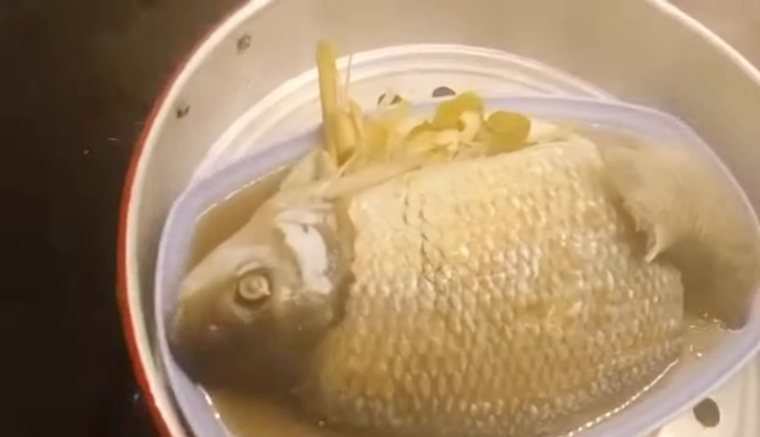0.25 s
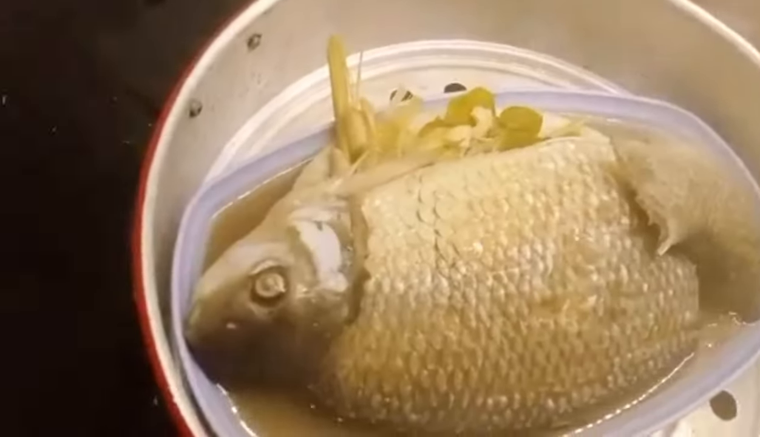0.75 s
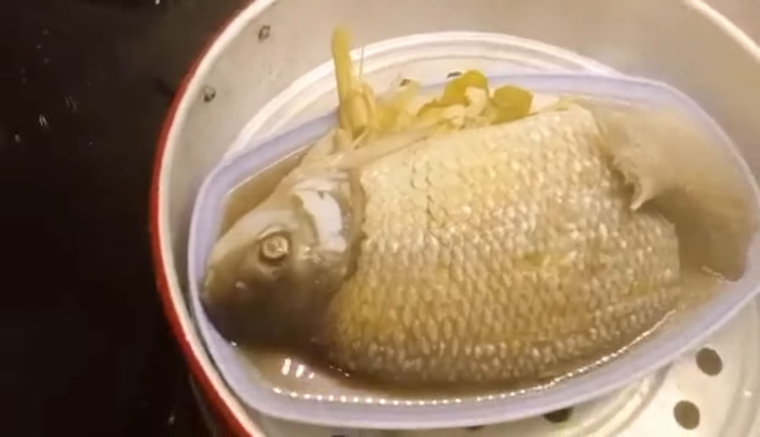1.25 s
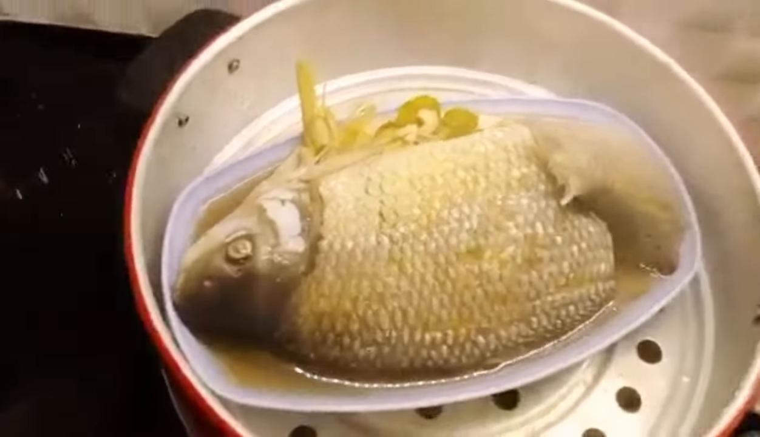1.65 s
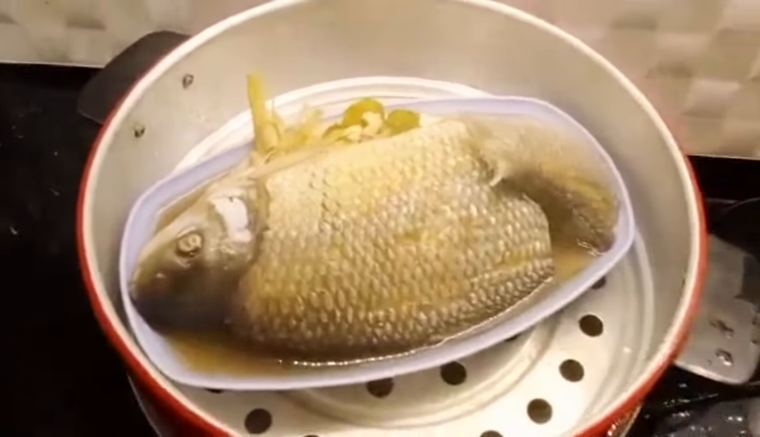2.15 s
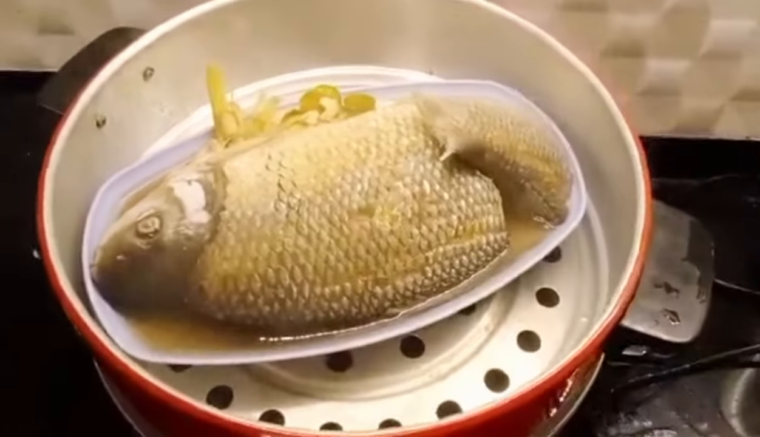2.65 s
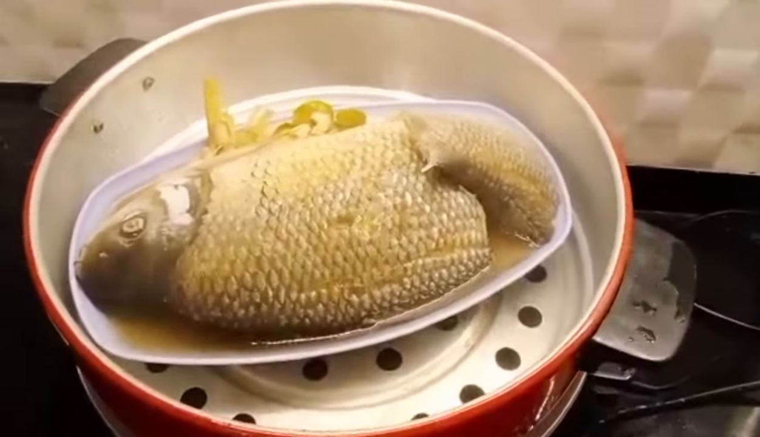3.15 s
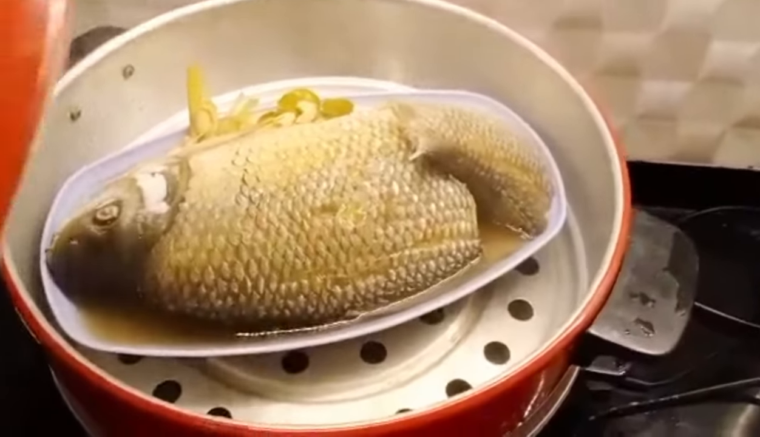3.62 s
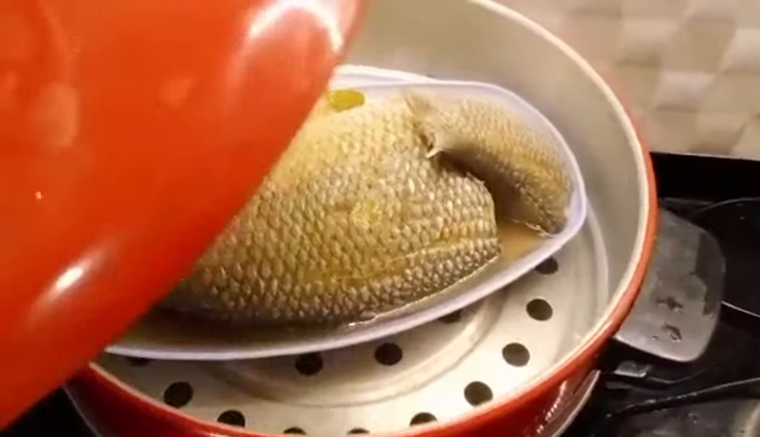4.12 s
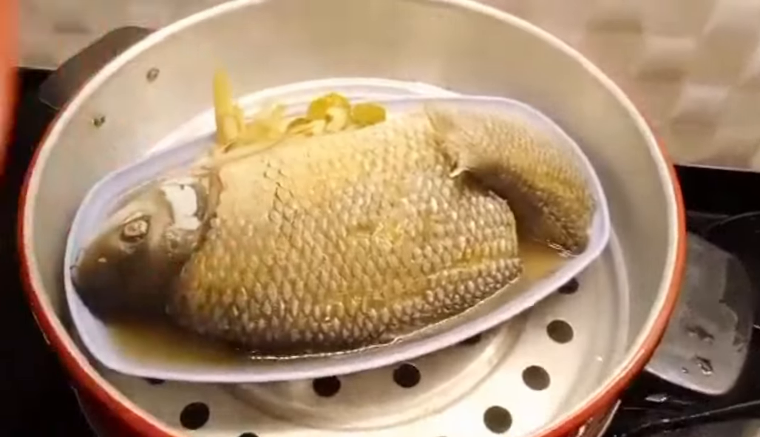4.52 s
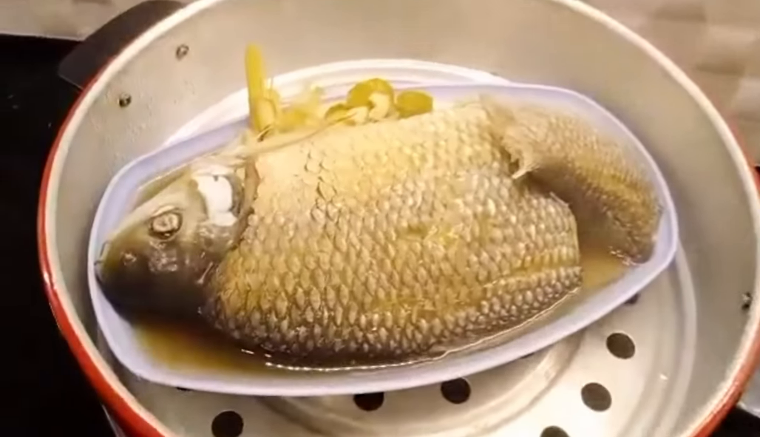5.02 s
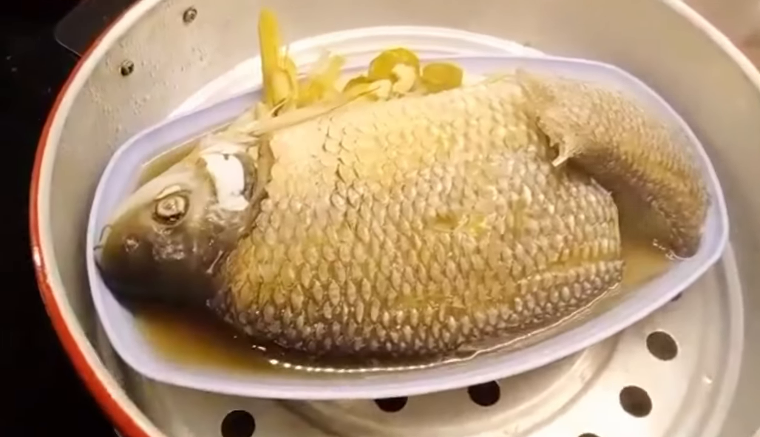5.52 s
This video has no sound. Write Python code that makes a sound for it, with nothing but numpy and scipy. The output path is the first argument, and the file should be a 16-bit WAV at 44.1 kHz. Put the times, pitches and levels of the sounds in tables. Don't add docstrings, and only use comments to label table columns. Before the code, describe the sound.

A continuous jet of steam from an open steamer pot fills the sound, airy and sizzling, its strength and brightness wavering as the phone moves. Weak bubble thuds lie far beneath. One muffled knock is followed later by a clearer metallic lid knock and a hollow swell as the lid swings by. The capture is close and dry, with suppressed lows, faint watery leaks of narrow tone and flickering stereo treble.

```python
import sys
import numpy as np
from scipy import signal
from scipy.fft import rfft, irfft, next_fast_len
from scipy.io import wavfile
from scipy.ndimage import uniform_filter1d

SR = 44100
rng = np.random.default_rng(int(sys.argv[2]) if len(sys.argv) > 2 else 0)


def unload_wav(signal):
    wavfile.write(
        sys.argv[1],
        SR,
        np.round(np.clip(np.atleast_2d(signal).T, -1, 1) * 32767).astype(np.int16),
    )


def field_ratio(decibels):
    return 10 ** (np.asarray(decibels, dtype=float) / 20)


N = 254872

# time in seconds, flow as level in dB, aim of the phone at the jets as brightness in dB.
STEAM_CURVE = [(0.0, -14, 1), (0.17, -13.5, 4), (0.5, -14, -0.3), (1.08, -19, 1), (1.4, -14, 0.7),
               (1.65, -14, 2.5), (2.05, -15.5, 0), (2.27, -12.5, -1.5), (2.42, -14, -2), (2.7, -18, -0.2),
               (3.1, -16.5, -3), (3.3, -16, -3.2), (3.56, -14, 0.8), (3.68, -15.8, 1.5), (3.88, -14, 0.3),
               (4.15, -16.0, -1.2), (5.25, -18, -1.3), (5.78, -14.5, -0.5)]
ZONE_CENTRES_HZ = [1170, 2200, 4200, 7200, 12000]
ZONE_FLOW_SWING = [-0.23, -.2, 0.11, -0.2, -0.027]
ZONE_AIM_SWING = [0.41, -0.34, 0.31, 0.7, 0.39]
ZONE_WANDER_DB = [0.96, .3, 0.28, 0.56, 0.74]
# time in seconds, level in dB.
LOW_EDGE_CURVE = [(0, 4.5), (.2, 2.5), (.95, 3), (1.06, 6), (1.35, 1), (3.2, 4.5), (3.95, 2), (4.3, -5),
                  (5.78, -4.5)]
# time in seconds, half length in seconds, centre in Hz, change in dB.
COLOUR_SWAYS = [(1.32, 0.025, 1180, -4), (1.408, 0.018, 1170, -6), (1.68, .03, 1170, -7.5),
                (2.86, 0.14, 1070, -7), (2.998, 0.034, 1150, -3), (3.4, 0.13, 1170, -9.5),
                (3.642, 0.048, 1180, -14), (4.1, 0.075, 1170, -2), (4.33, 0.046, 1170, -0.5),
                (4.6, 0.046, 1200, -7), (4.9, 0.049, 1180, -4.5), (5.06, 0.026, 1180, -10),
                (5.3, 0.048, 1170, -7.5), (5.64, 0.04, 1170, -8), (5.55, .1, 1630, -7),
                (.32, 0.13, 6300, 1), (1.07, 0.065, 4580, -2), (1.58, 0.13, 2750, -1.5),
                (2.08, 0.1, 12100, -3), (2.39, 0.023, 7240, 4.5), (3.15, 0.074, 12000, -2.5),
                (4.25, 0.11, 4200, 1.8), (4.65, 0.053, 3800, 3.5), (4.62, 0.065, 12000, 4),
                (4.98, 0.062, 12000, 2), (5.41, 0.026, 5800, -4.5), (1.2, 0.18, 11000, 4),
                (5.72, 0.045, 6500, 4)]
# frequency in Hz, level in dB per Hz.
HISS_SPECTRUM = [(610, -42), (1030, -6), (1100, -1.5), (1220, -2), (1510, -3.5), (1830, -6), (1990, -3),
                 (2490, -0.5), (3970, 1), (4860, -2.5), (6830, -3), (9300, -21), (11300, -16.5),
                 (12500, -5), (13100, -4)]
# frequency in Hz, level in dB per Hz.
SIDE_SPECTRUM = [(2350, -49), (4000, -18), (4100, -5), (4300, -4), (6500, -0.5), (7340, -5), (9360, -19),
                 (11500, -12.5), (12200, -5.5), (12800, -5.5), (16600, -39), (22000, -120)]
# frequency in Hz, width in Hz, dB re body.
TRAY_WHISTLES = [(1490, 210, -15.5), (1647, 40, -19), (3990, 280, -12), (6740, 250, -48),
                 (12830, 600, -15.5)]
# frequency in Hz, level in dB per Hz.
SIMMER_SPECTRUM = [(120, -55), (200, -15), (318, -4.5), (383, -5.5), (451, -1), (491, -6.5), (649, -2),
                   (738, -2.5), (800, -6), (1040, -38), (1760, -120)]
# frequency in Hz, level in dB per Hz.
RUMBLE_SPECTRUM = [(15, -45), (25, -6), (48, 3), (75, -1), (91, -1.5), (130, 7), (161, -12), (200, -15.5),
                   (260, -1), (340, 5.5), (570, -120)]
# frequency in Hz, width in Hz, dB re rumble.
BASE_MODES = [(93.5, 28, 0), (159, 10.4, -4.5)]
# start in seconds, peak in dB.
BUBBLE_BURSTS = [(0.114, -36), (0.411, -32.5), (0.454, -40), (0.559, -45), (0.658, -31.5), (0.836, -30),
                 (1.239, -46), (1.346, -35), (1.747, -40), (1.891, -40), (1.953, -45), (2.567, -31.5),
                 (3.099, -33), (3.299, -38), (3.675, -36), (3.805, -33), (4.299, -52), (4.57, -39),
                 (4.874, -46), (4.938, -50), (5.491, -33), (5.617, -37)]
# start in seconds, peak in dB.
FRINGE_OPENINGS = [(0.019, -28.5), (0.187, -30), (0.297, -34), (0.457, -33), (0.659, -52), (1.044, -32),
                   (1.222, -32), (1.495, -33), (1.695, -29), (2.066, -32), (2.302, -30), (2.424, -31),
                   (3.169, -28.5), (3.298, -47), (3.558, -27.5), (3.619, -31), (3.739, -23), (3.851, -18.5),
                   (4.074, -37), (5.656, -36)]
# time in seconds, length in seconds, Hz, level in dB.
BAND_LEAKS = [(0.026, 0.05, 292, -41), (0.454, 0.068, 425, -43), (1.55, 0.053, 433, -48),
              (2.203, .06, 308, -45), (2.276, 0.1, 430, -47), (3.187, 0.12, 460, -36),
              (3.31, 0.029, 1070, -28.5), (3.422, 0.079, 446, -43), (3.57, 0.57, 1500, -30.5),
              (3.688, 0.064, 282, -46), (3.815, 0.16, 470, -36), (4.008, 0.2, 634, -36),
              (4.323, 0.081, 660, -47), (4.558, 0.42, 1060, -36), (4.72, 0.1, 320, -42.5),
              (4.887, 0.25, 1490, -34.5), (5.133, 0.051, 1060, -34.5), (5.145, 0.046, 454, -49),
              (3.645, 0.073, 480, -42), (3.193, 0.077, 593, -37.5), (4.114, 0.1, 869, -36),
              (0.864, 0.046, 450, -41), (0.876, 0.035, 280, -44), (3.153, 0.13, 150, -53),
              (3.963, 0.023, 460, -34), (2.283, 0.16, 3920, -21.5), (5.411, 0.041, 1060, -36.5),
              (5.499, 0.14, 160, -48.5), (5.63, 0.044, 660, -46), (5.742, 0.081, 1203, -37)]
# start in seconds, peak in dB, softness in Hz, share of lid ring 0-1, tail in seconds.
LID_KNOCKS = [
    (0.845, -23, 800, 0.25, 0.096),
    (3.141, -20.5, 1100, 0.93, 0.09),
]
# frequency in Hz, level in dB, time to fall by 60 dB in seconds.
LID_MODES = [(160, -1.5, 0.28), (460, 1.5, 0.11), (660, 20, 0.082), (1060, 9.5, 0.26), (1230, 22.5, 0.1),
             (1450, 17, 0.087)]
# frequency in Hz, width in Hz, level in dB.
LID_HOLLOW = [(470, 71, -5), (642, 46, 1), (558, 44, -3.5), (754, 42, -6), (1150, 57, -2), (1500, 72, -6.5)]
# frequency in Hz, share of the running noise power that is taken off.
NOISE_SHARE = [(60, 0.16), (300, 0.16), (1000, 0.42), (2000, 0.09), (6000, 0.21), (13000, 0.066)]
# frequency in Hz, chance that the band drops out.
SIDE_DROPOUTS = [(4100, .7), (4500, .42), (4900, .2), (5400, .07), (6500, .03), (8000, .08), (9000, .14),
                 (11000, .17), (12000, .3), (12800, .45)]

OPEN_HZ, TOP_HZ = 1005, 13070
BODY_DB = -4.5
SWAY_OCTAVES = 0.28
SIMMER_LEVEL_DB, SIMMER_UNDER_LID_DB = -49.5, -39
BURST_RISE_S, BURST_FALL_S, BURST_DB, RUMBLE_DB = 0.016, 0.035, -10.5, -53.5
OPEN_RISE_S, OPEN_FALL_S, OPEN_DB, SHUT_DB = 0.01, 0.075, -10, -49.5
SWING_S, COMING_S, GOING_S, SWING_DB = 3.834, 0.16, 0.096, -24.5


def in_time(rows):
    s, *columns = np.transpose(rows)
    return [np.interp(np.arange(N) / SR, s, c) for c in columns]


def at_hz(points, hz):
    table = np.array(points)
    return np.interp(np.log(hz + 1), np.log(table[:, 0]), table[:, 1])


def rms_one(x):
    return x / np.sqrt(np.mean(x ** 2) + 1e-20)


def held(x, seconds):
    power = uniform_filter1d(x ** 2, size=round(seconds * SR))
    return rms_one(x / (power + 0.1) ** 0.49)


def drift(rate_hz):
    r = np.exp(-80 * np.pi * rate_hz / SR)
    noise = rng.standard_normal(N // 40 + 2002)
    slow = signal.lfilter([1], [1, -2 * r, r * r], noise)[2000:]
    return np.interp(np.arange(N) / 40, np.arange(len(slow)), rms_one(slow))


def swells(events, rise_s, fall_s):
    s, db = np.transpose(events)
    t = np.arange(N)[::40] / SR - s[:, None] - rise_s
    shape = np.exp(-np.where(t < 0, t / rise_s, t / fall_s) ** 2)
    return np.interp(np.arange(N) / 40, np.arange(t.shape[1]), field_ratio(db) @ shape)


def resonance(x, hz, width_hz):
    r = np.exp(-np.pi * width_hz / SR)
    top = [(1 - r * r) / 2, 0, (r * r - 1) / 2]
    return signal.lfilter(top, [1, -2 * r * np.cos(2 * np.pi * hz / SR), r * r], x)


def narrow(noise, hz, width_hz):
    return rms_one(resonance(resonance(noise, hz, width_hz), hz, width_hz))


def unsteady_notes(modes, unrest_db, rate_hz):
    notes = 0
    for hz, width_hz, db in modes:
        level = field_ratio(db + unrest_db * drift(rate_hz))
        notes = notes + level * narrow(rng.standard_normal(N), hz, width_hz)
    return notes


def only(x, low_hz, high_hz):
    size = next_fast_len(N)
    hz = np.arange(size // 2 + 1) * SR / size
    return irfft(rfft(x, size) * ((hz > low_hz) & (hz < high_hz)), size)[..., :N]


def bands(spectrum, source, count):
    hz, level_db = np.transpose(spectrum)
    size = next_fast_len(N)
    pitch = np.log(np.arange(size // 2 + 1) * SR / size + 1e-9)
    colour = field_ratio(np.interp(pitch, np.log(hz), level_db, left=-200, right=-200))
    lines = rfft(source, size) * colour
    lines /= np.sqrt(2 * np.sum(np.abs(lines) ** 2) / size / N)
    centres = np.linspace(np.log(hz[0]), np.log(hz[-1]), count)
    for centre in centres:
        slice_ = np.clip(1 - np.abs(pitch - centre) / (centres[1] - centres[0]), 0, 1)
        yield np.exp(centre), irfft(lines * slice_, size)[:N]


def lumpy(spectrum, unrest_db, rate_hz, count):
    parts = bands(spectrum, rng.standard_normal(N), count)
    return sum(field_ratio(unrest_db * drift(rate_hz)) * band for _, band in parts)


def turbulence(spit_per_s, spit_db):
    hits = rng.random(N) < spit_per_s / SR
    sizes = field_ratio(4.75 * np.minimum(rng.exponential(1, N), 4))
    drops = hits * sizes * rng.choice([-1, 1], N)
    return rng.standard_normal(N) + field_ratio(spit_db) * rms_one(drops)


def swayed(hz):
    s, half_s, centre_hz, db = np.transpose(COLOUR_SWAYS)
    t = np.arange(0, N, 100) / SR
    reach = db * np.exp(-(np.log2(hz / centre_hz) / SWAY_OCTAVES) ** 2)
    humps = np.exp(-((t - s[:, None]) / half_s[:, None]) ** 2)
    return np.interp(np.arange(N) / SR, t, reach @ humps)


def steam(spectrum, level_db, gust, patchy_db, count):
    flow, aim = in_time(STEAM_CURVE)
    zones = np.outer(ZONE_FLOW_SWING, flow) + np.outer(ZONE_AIM_SWING, aim)
    zones += [db * drift(10.7) for db in ZONE_WANDER_DB]
    zones[0] += in_time(LOW_EDGE_CURVE)[0]
    zones -= zones.mean(axis=1, keepdims=True)
    hiss, neighbour = 0, drift(12.0)
    for hz, band in bands(spectrum, turbulence(2500, -8.0), count):
        place = np.interp(np.log(hz), np.log(ZONE_CENTRES_HZ), np.arange(5))
        zone_db = np.clip(1 - np.abs(np.arange(5) - place), 0, 1) @ zones + swayed(hz)
        gust_db = gust * (hz / 4000) ** 0.48
        own = drift(30.4)
        flicker_db = patchy_db * (own + 0.11 * neighbour)
        hiss = hiss + field_ratio(zone_db + gust_db + flicker_db) * band
        neighbour = own
    return field_ratio(flow + BODY_DB + level_db) * only(hiss, OPEN_HZ, TOP_HZ)


def whistles():
    return field_ratio(in_time(STEAM_CURVE)[0] + BODY_DB) * unsteady_notes(TRAY_WHISTLES, 2.2, 3.5)


def lid_near():
    t = np.arange(N) / SR - SWING_S
    return np.exp(-np.abs(np.where(t < 0, t / COMING_S, t / GOING_S)) ** 1.13)


def simmer():
    level = field_ratio(SIMMER_LEVEL_DB) + field_ratio(SIMMER_UNDER_LID_DB) * lid_near() ** 0.7
    return field_ratio(2.5) * level * lumpy(SIMMER_SPECTRUM, 1.6, 14.0, count=8)


def rumble():
    boil = field_ratio(-4.0) * lumpy(RUMBLE_SPECTRUM, 1.2, 17.0, count=5)
    boom = unsteady_notes(BASE_MODES, 2.7, 4.2)
    heat = field_ratio(RUMBLE_DB) + field_ratio(BURST_DB) * swells(BUBBLE_BURSTS, BURST_RISE_S, BURST_FALL_S)
    return heat * field_ratio(2.0) * held(boil + boom, 0.034)


def fringe():
    noise = rms_one(only(resonance(rng.standard_normal(N), 905, 130), 800, OPEN_HZ))
    gate = field_ratio(SHUT_DB) + field_ratio(OPEN_DB) * swells(FRINGE_OPENINGS, OPEN_RISE_S, OPEN_FALL_S)
    return field_ratio(3.5) * gate * held(noise, 0.056)


def leaks():
    out, white = np.zeros(N), rng.standard_normal(N)
    for s, length_s, hz, db in BAND_LEAKS:
        start = max(round((s - length_s * 0.584) * SR), 0)
        end = round((s + length_s * 0.6) * SR)
        piece = narrow(white[start:end], hz, 40 + 0.011 * hz)
        envelope = np.abs(signal.hilbert(piece))
        piece = rms_one(piece / (envelope + 0.6) ** 0.6)
        out[start:start + len(piece)] += field_ratio(db) * piece * signal.windows.tukey(len(piece), 0.3)
    return out


def knocks():
    out, t = np.zeros(N), np.arange(SR // 4) / SR
    for s, db, soft_hz, ring, tail_s in LID_KNOCKS:
        click = 24.0 * np.exp(-t / 0.0003)
        rattle = 2.0 * rng.standard_normal(len(t)) * (t < tail_s) * np.exp(-t / tail_s)
        softness = signal.butter(3, [75, soft_hz], "band", fs=SR, output="sos")
        thud = signal.sosfilt(softness, click + rattle)
        rings = sum(field_ratio(mode_db - 60 * t / t60) * np.sin(2 * np.pi * hz * t) for hz, mode_db, t60 in LID_MODES)
        rings *= np.clip(t / 0.0023, 0, 1)
        rings *= np.clip((tail_s + 0.046 - t) / 0.015, 0, 1)
        share, at = np.clip(ring, 0, 1), round(s * SR)
        knock = share ** 2 * rings + ((1 - share) ** 2 + 0.11) * thud
        out[at:at + len(t)] += field_ratio(db - 10.5) * knock
    return out


def swing():
    notes = rms_one(unsteady_notes(LID_HOLLOW, 2.6, 4.1))
    return field_ratio(SWING_DB - 6) * lid_near() * field_ratio(5.5) * held(notes, 0.04)


def scene():
    gust = 0.098 * drift(24.0) + 0.59 * drift(38.0)
    middle = steam(HISS_SPECTRUM, 5.67, gust, patchy_db=1.3, count=22) + whistles()
    middle = middle + simmer() + rumble() + fringe() + leaks() + knocks() + swing()
    side = steam(SIDE_SPECTRUM, -3.5, gust, patchy_db=1.7, count=10)
    side = side * field_ratio(-0.4 * (in_time(STEAM_CURVE)[0] + 17.5))
    return np.array([middle + side, middle - side])


def suppressor(x):
    hz, _, bins = signal.stft(x, SR, nperseg=1024, noverlap=768)
    power = np.abs(bins) ** 2 + 1e-18
    now = uniform_filter1d(uniform_filter1d(power, size=9, axis=1), size=2, axis=0)
    noise = uniform_filter1d(uniform_filter1d(power, size=120, axis=1), size=9, axis=0)
    share = np.clip(at_hz(NOISE_SHARE, hz), 0, 1.5)[:, None]
    power_gain = np.clip(1 - share * noise / now, field_ratio(-4.0) ** 2, 1)
    return signal.istft(bins * np.sqrt(power_gain), SR, nperseg=1024, noverlap=768)[1][:N]


def patchy_side(side):
    lead, band_hz = 626, 345
    hz, _, bins = signal.stft(np.pad(side, (lead, 0)), SR, "cosine", nperseg=2048, noverlap=1024)
    band = (hz // band_hz).astype(int)
    frames = bins.shape[1]
    frame_luck = rng.standard_normal(frames)
    band_luck = uniform_filter1d(rng.standard_normal((band[-1] + 1, frames)), size=2, axis=0)
    luck = uniform_filter1d(band_luck + 0.55 * frame_luck, size=3, axis=1)
    rank = luck.argsort(axis=1).argsort(axis=1) / frames
    chance = at_hz(SIDE_DROPOUTS, (band + 0.5) * band_hz)[:, None]
    kept = (rank[band] > chance) & (hz < 12790)[:, None]
    coarse = field_ratio(2.4 * rng.standard_normal(luck.shape) + 2.8 * rng.standard_normal(frames))[band]
    return signal.istft(bins * kept * coarse, SR, "cosine", nperseg=2048, noverlap=1024)[1][lead:lead + N]


def top_cut(x):
    return signal.sosfilt(signal.butter(12, 14430, fs=SR, output="sos"), x)


def record(dry):
    middle = suppressor(dry.mean(axis=0))
    side = patchy_side((dry[0] - dry[1]) / 2)
    middle = only(0.95 * np.tanh(middle / 0.95), 12, TOP_HZ)
    return top_cut(np.array([middle + side, middle - side]))


dry = scene()
out = record(dry)
unload_wav(out)
```